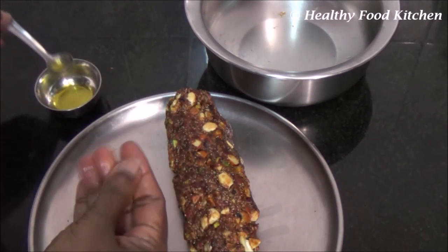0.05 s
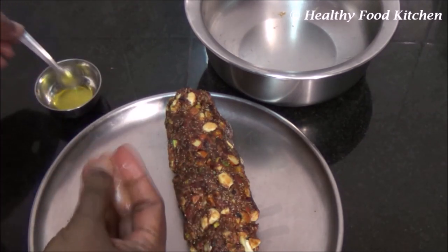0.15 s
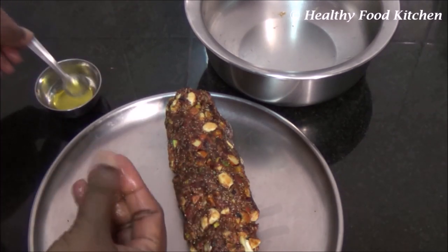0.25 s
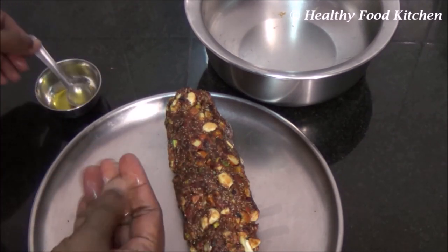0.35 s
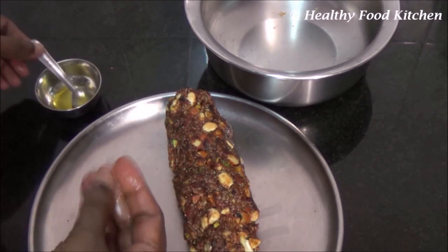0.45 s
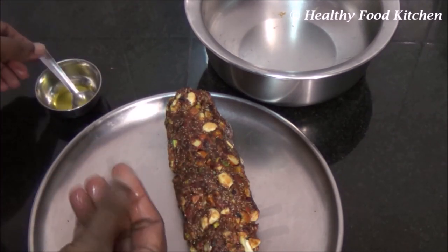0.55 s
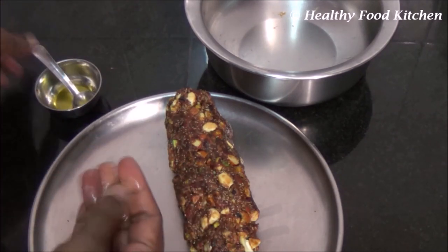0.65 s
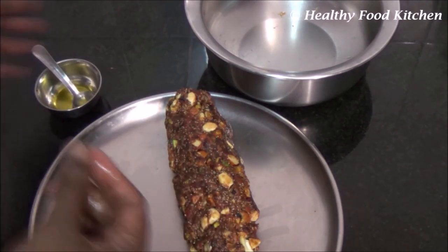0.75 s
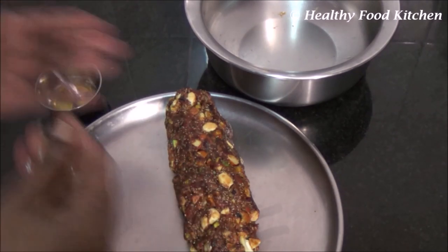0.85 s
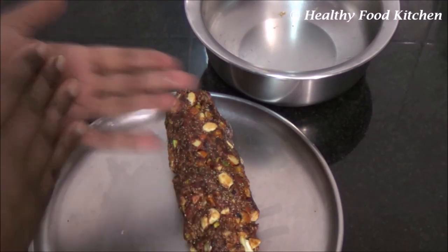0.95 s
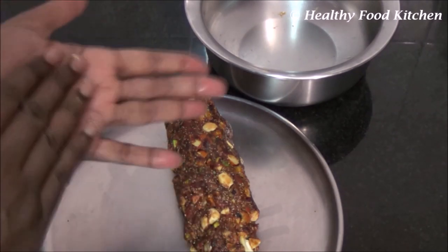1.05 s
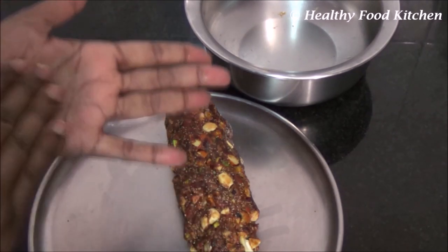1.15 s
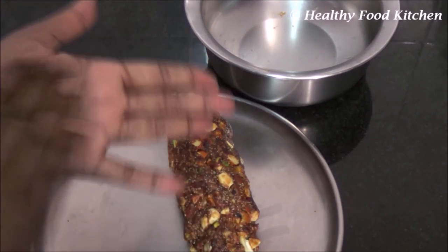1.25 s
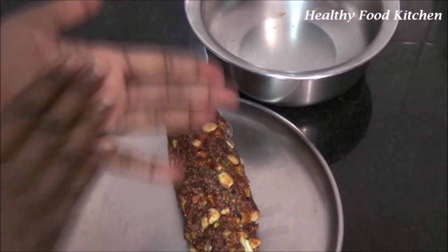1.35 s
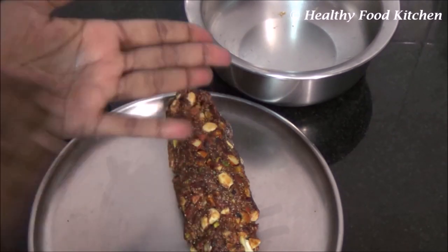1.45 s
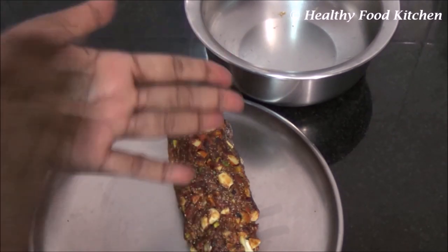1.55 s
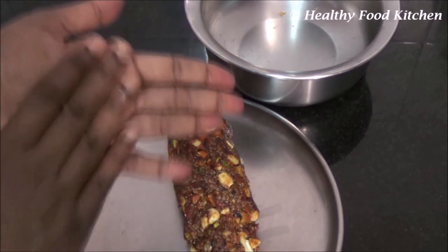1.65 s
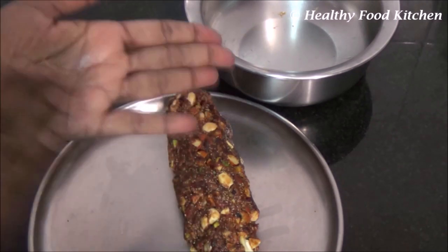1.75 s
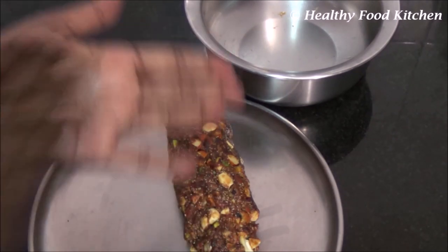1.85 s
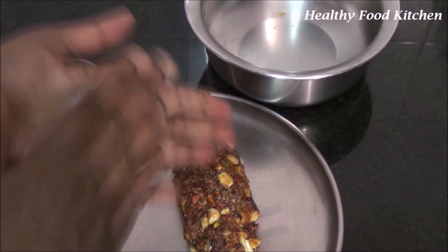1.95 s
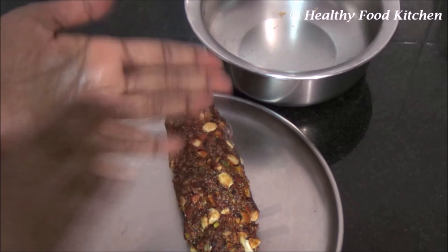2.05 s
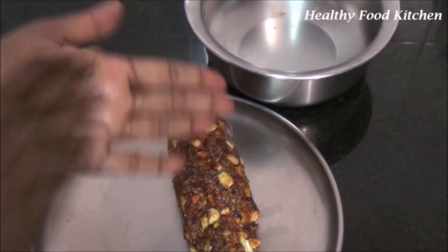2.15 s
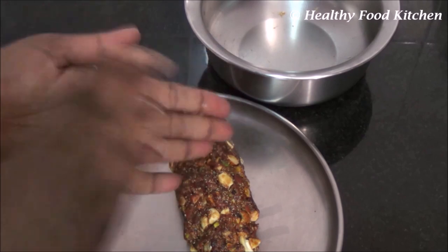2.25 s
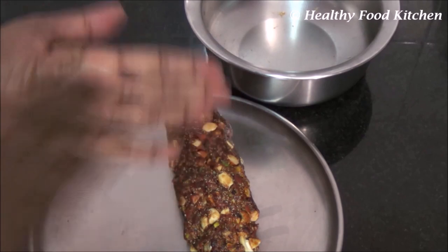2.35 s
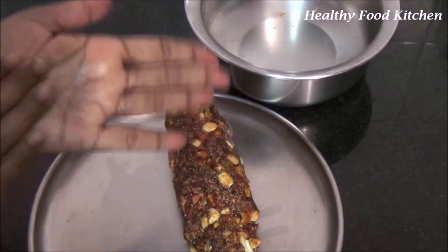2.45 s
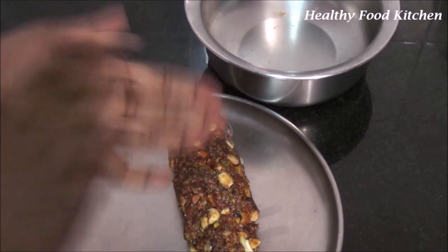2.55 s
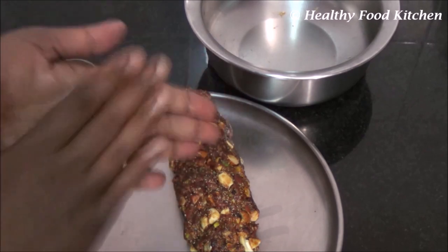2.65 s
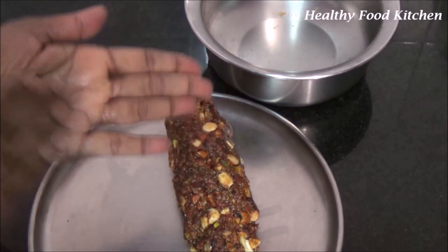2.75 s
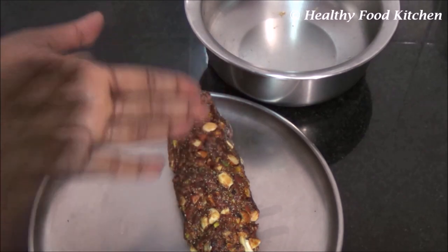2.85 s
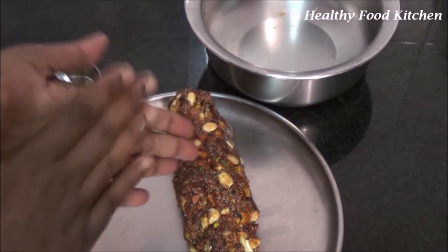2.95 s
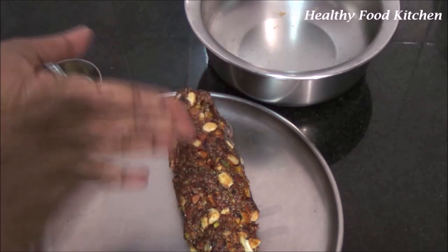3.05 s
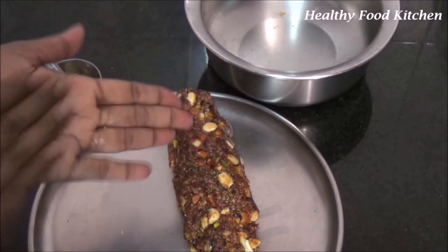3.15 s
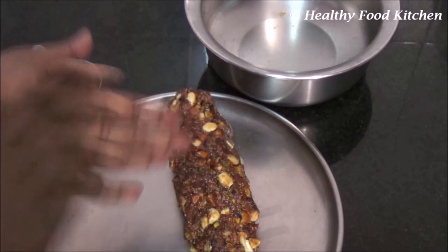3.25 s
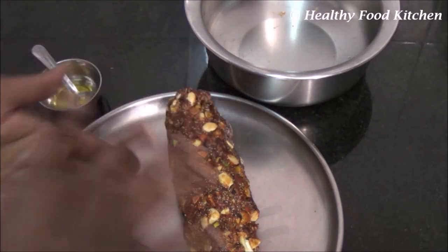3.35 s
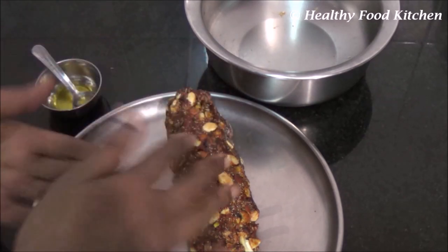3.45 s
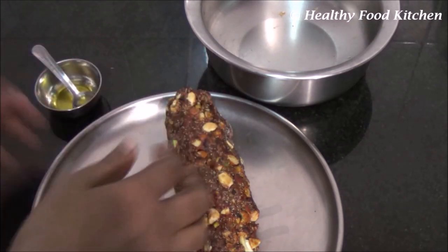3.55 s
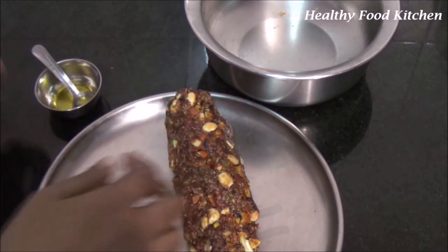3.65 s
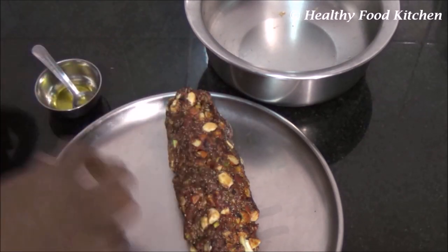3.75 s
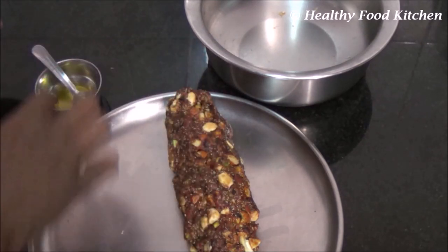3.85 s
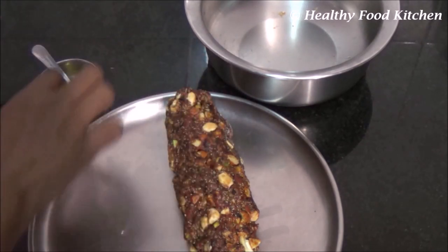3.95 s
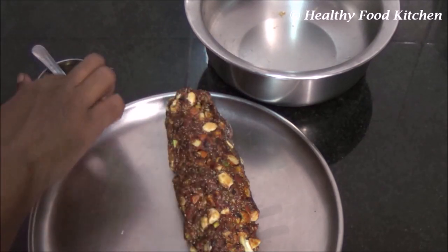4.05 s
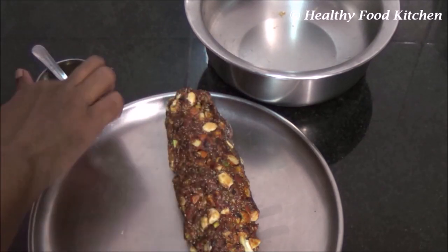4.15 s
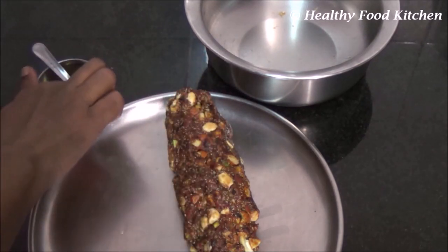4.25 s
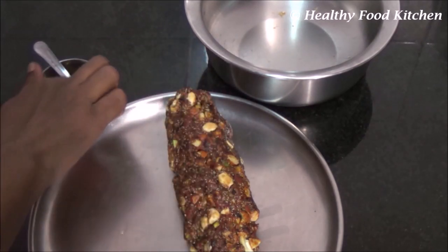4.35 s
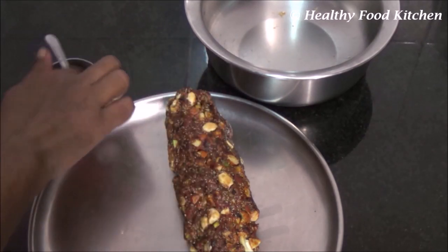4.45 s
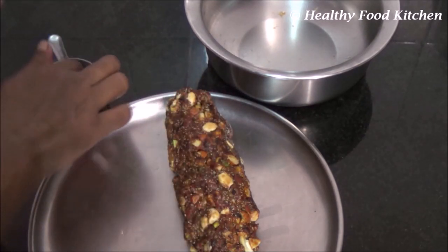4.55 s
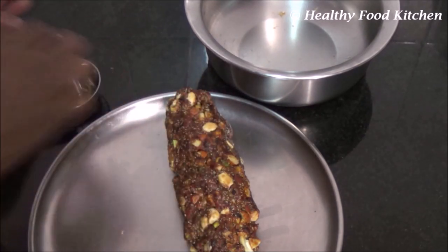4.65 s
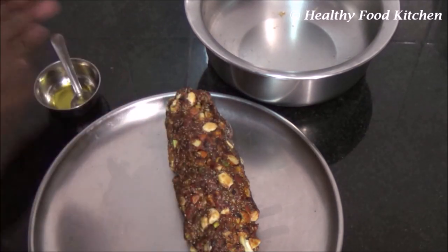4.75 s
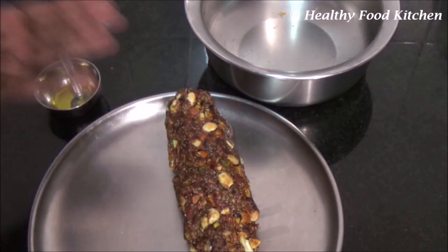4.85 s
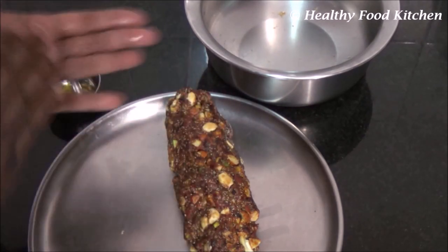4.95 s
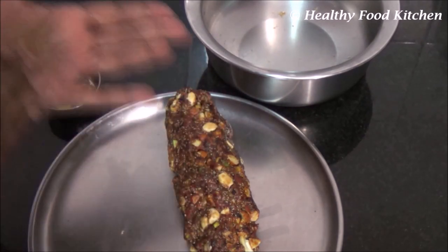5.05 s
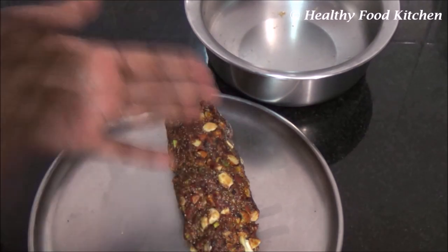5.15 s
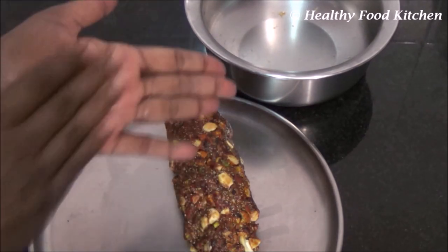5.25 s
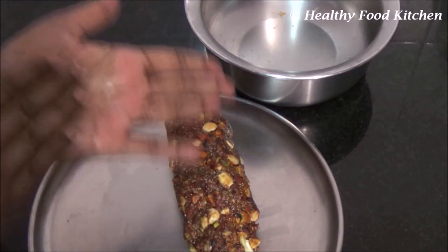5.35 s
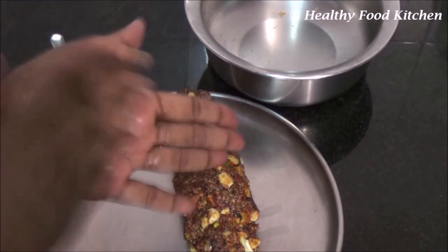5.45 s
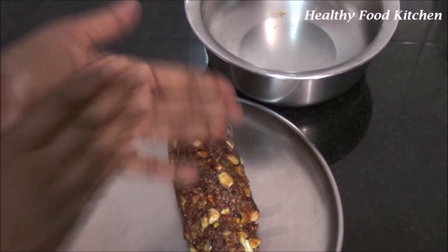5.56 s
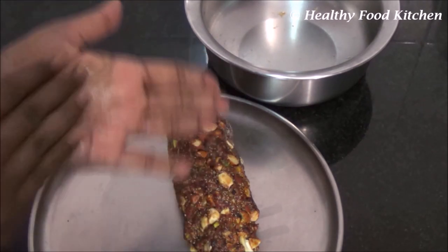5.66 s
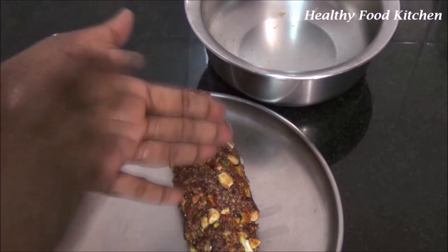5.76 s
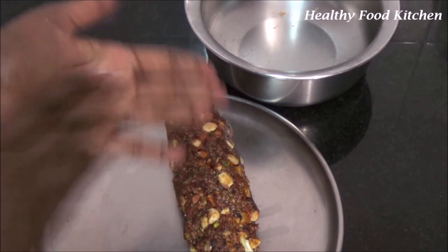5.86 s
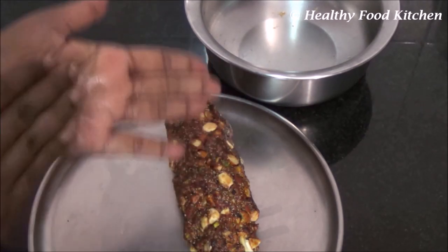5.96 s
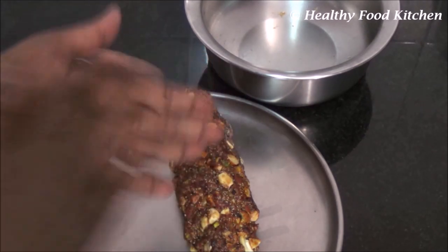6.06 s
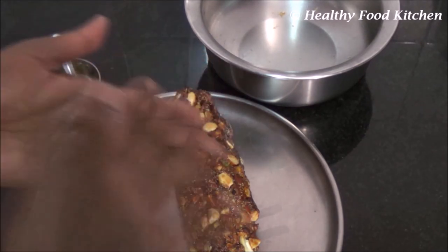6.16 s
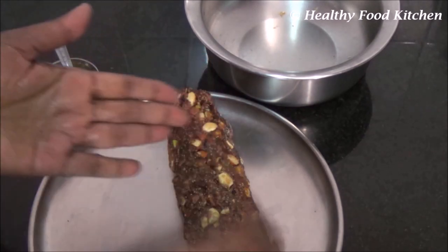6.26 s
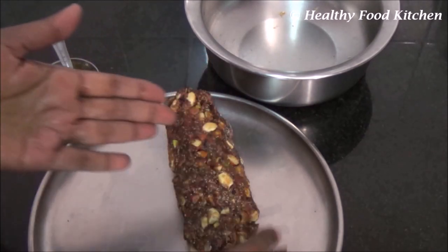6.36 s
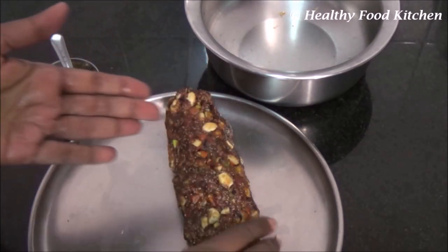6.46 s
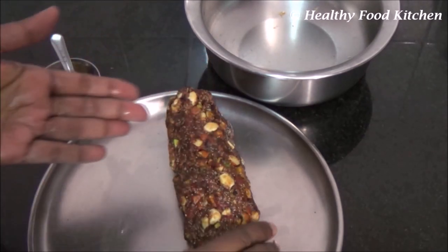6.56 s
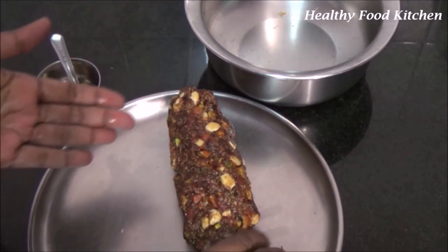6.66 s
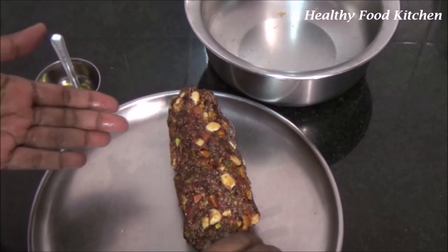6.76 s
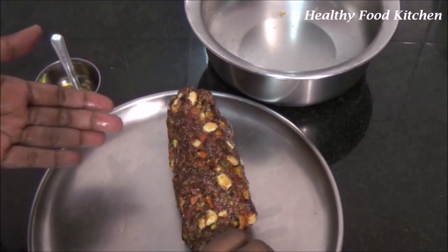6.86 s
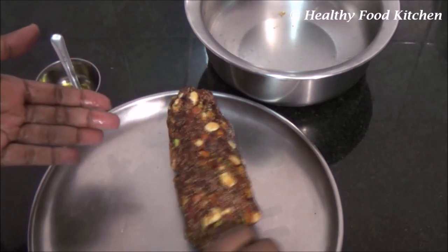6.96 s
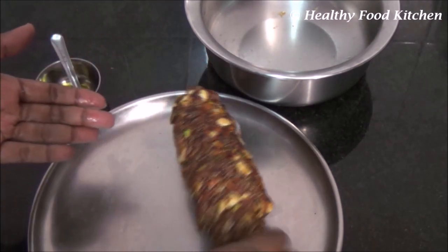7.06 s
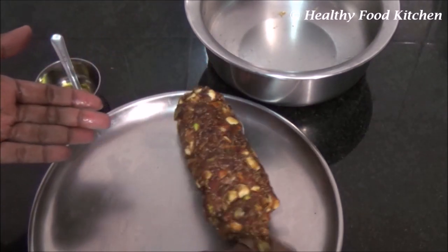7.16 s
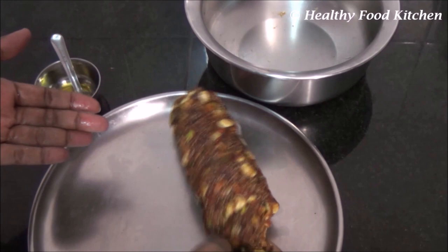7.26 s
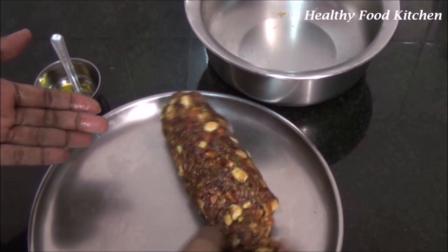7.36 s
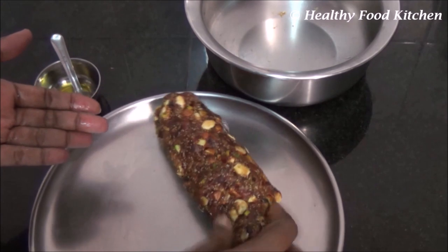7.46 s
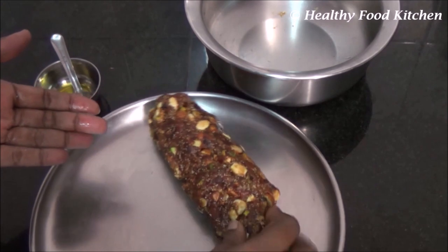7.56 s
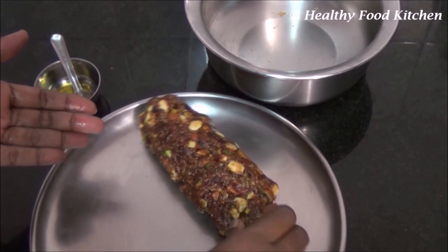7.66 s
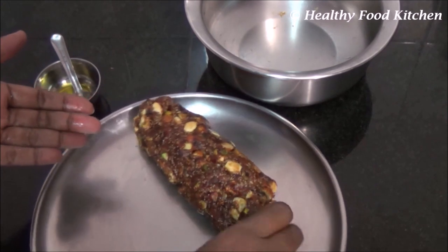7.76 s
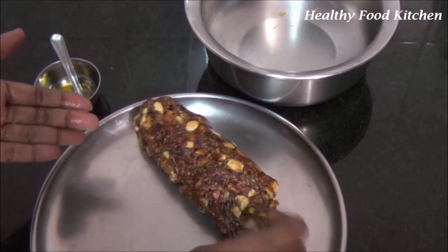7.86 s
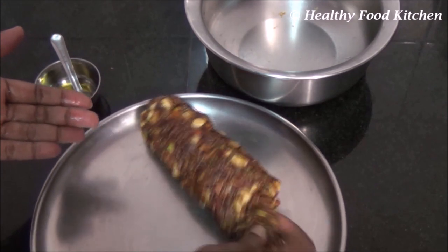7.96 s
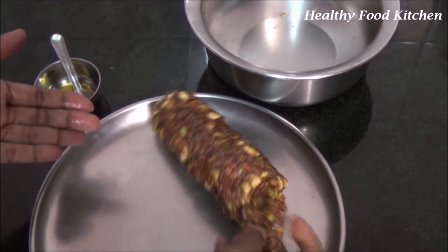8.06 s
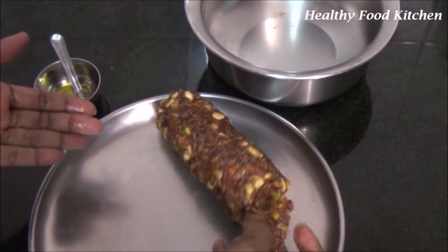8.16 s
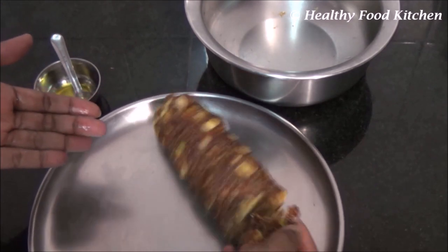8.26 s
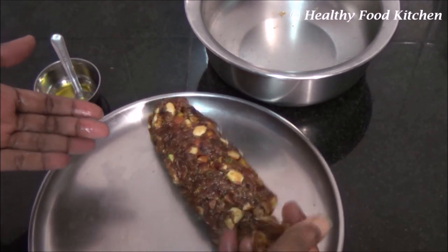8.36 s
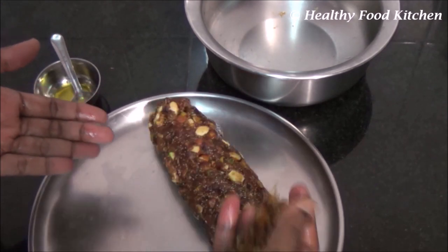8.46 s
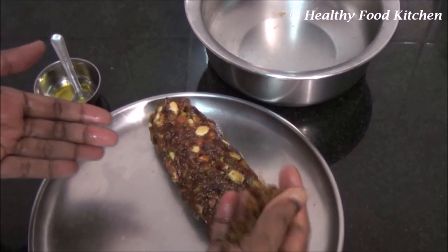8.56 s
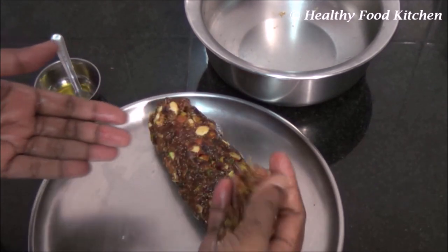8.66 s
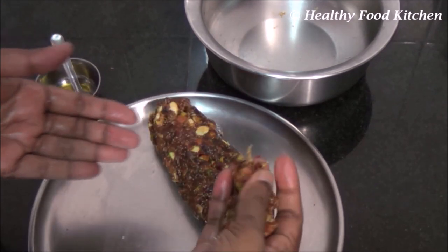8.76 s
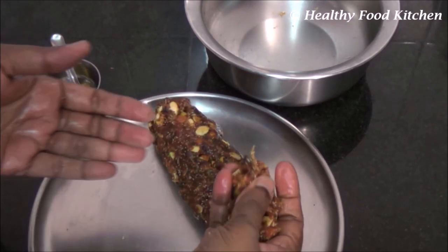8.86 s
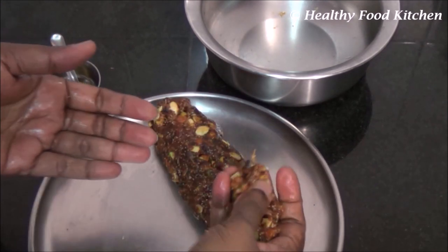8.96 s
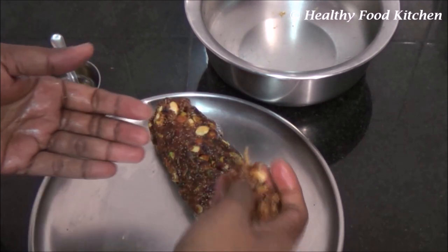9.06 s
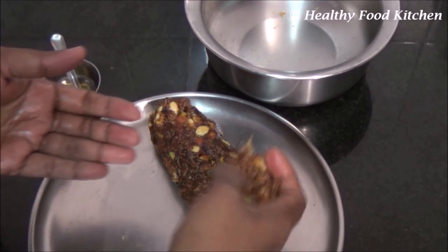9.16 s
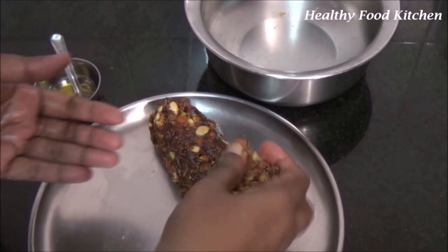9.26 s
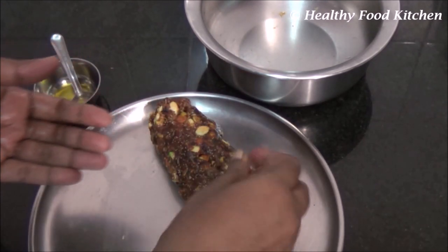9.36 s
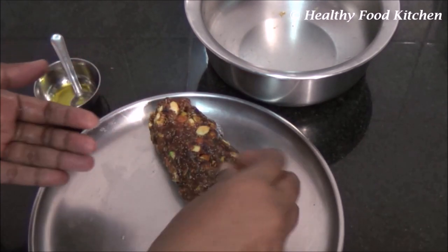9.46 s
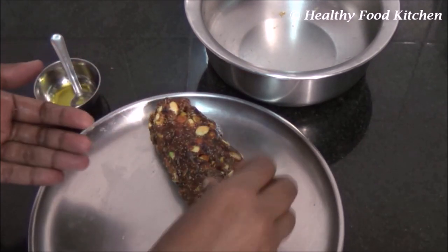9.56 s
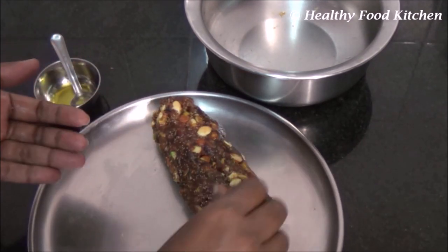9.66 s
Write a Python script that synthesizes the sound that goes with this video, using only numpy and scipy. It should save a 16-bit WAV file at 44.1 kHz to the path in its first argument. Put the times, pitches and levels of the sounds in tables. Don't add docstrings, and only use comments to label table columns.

```python
import sys
import numpy as np
from scipy import signal
from scipy.fft import rfft, irfft
from scipy.io import wavfile
from scipy.ndimage import uniform_filter1d

SR = 44100
rng = np.random.default_rng(int(sys.argv[2]) if len(sys.argv) > 2 else 0)


def attenuation_scalar(level_db):
    decades = np.asarray(level_db, float) / 20
    return 10 ** decades


def transcribe(u):
    v = np.clip(np.atleast_2d(u).T, -1, 1)
    q = np.round(v * 32767).astype(np.int16)
    wavfile.write(sys.argv[1], SR, q)


N = 428211


def evened(x):
    return x / np.sqrt(np.mean(x ** 2) + 1e-20)


def read(points, hz):
    f, value = np.transpose(points)
    return np.interp(np.log(hz + 1), np.log(f + 1), value)


def add(mix, s, sound):
    part = mix[round(s * SR):][:len(sound)]
    part += sound[:len(part)]


def colour(x, points):
    hz = np.fft.rfftfreq(x.shape[-1], 1 / SR)
    return evened(irfft(rfft(x) * attenuation_scalar(read(points, hz)), x.shape[-1]))


def resonate(x, hz, width):
    turn = np.exp(2j * np.pi * np.cumsum(hz * np.ones(len(x))) / SR)
    r = np.exp(-np.pi * abs(width) / SR)
    smooth = signal.lfilter([1 - r], [1, -r], x / turn)
    return 2 * (turn * smooth).real


def wander(seconds, n=N):
    size = max(int(seconds * SR), 1)
    once = uniform_filter1d(rng.standard_normal(n), size)
    return evened(uniform_filter1d(once, size))


def grains(n, per_s, spread_db):
    size = attenuation_scalar(spread_db * np.minimum(rng.exponential(1, n), 5)) * rng.standard_normal(n)
    return evened(size * (rng.random(n) < per_s / SR))


def ring(t, hz, width):
    return np.sin(2 * np.pi * hz * t) * np.exp(-np.pi * abs(width) * t)


def patchy(x, db):
    z = signal.stft(x, nperseg=256)[2]
    field = uniform_filter1d(rng.standard_normal(z.shape), size=4, axis=0)
    field = uniform_filter1d(field, size=8, axis=1)
    return evened(signal.istft(z * attenuation_scalar(db * evened(field)), nperseg=256)[1][:len(x)])


def swell(t, middle, length, db, power=2):
    return attenuation_scalar(db - 6 * abs(2 * (t - middle) / length) ** power)


def lingering(t, middle, length, db):
    stroke = swell(t, middle, length, db + .8, 1.5)
    trail = swell(t, middle + .3 * length, 2.2 * length, db - 13)
    return np.hypot(stroke, trail)


def together(gains):
    return np.sqrt((gains ** 2).sum(0))


def diffuse(left, other):
    # f/Hz, left-right likeness [0 to 1]
    likeness = [(60, 0.95), (130, 0.86), (290, 0.94), (640, 0.58), (1410, 0.16), (3100, 0.29), (6820, 0.33),
                (15000, 0.9)]
    same = np.clip(read(likeness, np.fft.rfftfreq(N, 1 / SR)), 0, 1)
    right = irfft(same * rfft(left) + np.sqrt(1 - same ** 2) * rfft(other), N)
    return np.array([left, right])


def rub(rows):
    # f/Hz, level/dB
    ridge_colour = [(6000, -15.5), (8500, -11), (10000, -2), (11500, 0), (13000, -3.5), (14500, -7.5),
                    (15700, -13.5)]
    # f/Hz, level/dB
    crease_colour = [(900, -19), (1800, -8), (2600, -4.5), (4000, -5), (5500, -2), (8000, -3), (11000, -8),
                     (15700, -23)]
    middle, length, pressure_db, crease_db = np.transpose(rows)[:, :, None]
    t = np.arange(round(middle.min()) - .2, round(middle.max()) + .7, 1 / SR)
    n = len(t)
    hiss = patchy(colour(grains(n, 18000., 1.15), ridge_colour), 1.5)
    scrape = patchy(colour(grains(n, 20000., 0.8), crease_colour), 1.9)
    creases = together(lingering(t, middle - .1 * length, 1.1 * length, pressure_db + crease_db))
    ridges = together(lingering(t, middle, .9 * length, pressure_db))
    tremble = attenuation_scalar(0.4 + 1.1 * wander(0.008, n))
    return t[0], tremble * (ridges * hiss + attenuation_scalar(0.3) * creases * scrape)


def palms():
    # middle t/s, length [s], pressure level/dB, creases level/dB
    bouts = [
        [(1.465, .065, -55, -2), (1.59, .09, -52, -4), (1.775, .10, -48.5, -2), (1.915, .12, -50.5, -3),
         (2.085, .10, -48, -2), (2.205, .12, -45.5, -1), (2.31, .06, -54, 2), (2.41, .12, -49, -2),
         (2.565, .08, -44, -2), (2.74, .085, -47.5, -2), (2.895, .08, -46, -1), (3.07, .13, -50.5, -2),
         (3.247, .085, -49, -1), (3.42, .10, -52.5, -2), (3.505, .06, -54.5, 0)],
        [(5.195, .05, -56, -2), (5.27, .07, -58, -3), (5.365, .09, -55, -1), (5.49, .1, -57.5, -2),
         (5.665, .1, -53.5, -1), (5.77, .09, -54.5, -3), (5.95, .08, -56, -1), (6.08, .09, -54.5, -2),
         (6.26, .08, -54.5, -1), (6.35, .05, -54, -3)],
    ]
    out = np.zeros(N)
    for rows in bouts:
        add(out, *rub(rows))
    return out


def pockets():
    # middle t/s, length [s], level/dB, from f/Hz, to f/Hz
    trapped_air = [(1.48, .06, -61, 2700, 2700), (1.6, .05, -62, 3600, 3600), (1.76, .06, -55, 5800, 5300),
                   (1.785, .05, -55, 2700, 2400), (1.86, .1, -58, 2800, 3100), (1.89, .06, -57, 3500, 3800),
                   (1.95, .04, -59, 6000, 6000), (2.04, .05, -58, 5800, 6200), (2.09, .08, -57, 2900, 2500),
                   (2.09, .06, -54, 5000, 5300), (2.15, .03, -53, 3100, 3300),
                   (2.185, .09, -50, 3800, 3800), (2.2, .06, -54, 6500, 6300), (2.3, .07, -55, 4900, 4700),
                   (2.42, .03, -57, 2000, 2000), (2.445, .05, -57, 2900, 2600),
                   (2.55, .05, -49, 3700, 3900), (2.555, .05, -53, 6000, 5800),
                   (2.57, .02, -55, 1900, 1900), (2.59, .025, -53, 4000, 3500),
                   (2.75, .05, -56, 5200, 5600), (2.82, .05, -59, 2900, 3200),
                   (2.885, .05, -48, 3700, 4500), (2.89, .04, -54, 6000, 6000),
                   (2.99, .06, -57, 4300, 4300), (3.08, .05, -58, 6500, 6300), (3.2, .04, -57, 3300, 3000),
                   (3.24, .045, -50, 3300, 3100), (3.235, .03, -55, 5800, 5800),
                   (3.29, .03, -57, 3000, 3500), (3.49, .04, -57, 4000, 3500), (4.7, .2, -64, 720, 800),
                   (5.39, .04, -60, 3200, 3200), (5.665, .04, -58, 2800, 2300),
                   (5.67, .03, -58, 4300, 4600), (5.9, .06, -61, 2800, 3000), (5.95, .04, -59, 3300, 3200),
                   (6.06, .09, -61, 2300, 3000), (6.27, .04, -61, 4000, 4200)]
    out, t = np.zeros(N), np.arange(-.2, .2, 1 / SR)
    for middle, length, db, from_hz, to_hz in trapped_air:
        hz = from_hz + (to_hz - from_hz) * np.clip(.5 + t / length, -.5, 1.5)
        width = from_hz / 5.5
        slips = grains(len(t), 5000., 1.1)
        sound = evened(resonate(resonate(slips, hz, width), hz, width))
        add(out, middle + t[0], swell(t, 0, length, db) * sound)
    return out


def fingers():
    # peak t/s, 20 dB rise [s], 20 dB fall [s], crackle level/dB, drag level/dB
    grips = [(.045, .05, .04, -60, -66), (.38, .6, .25, -69, -75), (.51, .012, .9, -65, -75),
             (1.19, .021, .045, -57, -57), (1.33, .12, .6, -59, -61), (5.085, .08, .08, -63, -75),
             (6.87, .25, .22, -55, -57), (7.054, .17, .11, -52.5, -48), (7.075, .1, .05, -57, -56),
             (7.165, .02, .05, -60, -52), (7.2, .05, .6, -59, -60), (7.546, .11, .065, -59, -57),
             (7.83, .4, .15, -56, -62), (7.88, .06, .2, -57, -62), (7.975, .06, .1, -57, -60),
             (8.06, .15, .2, -58, -60), (8.106, .006, .08, -51, -48), (8.15, .03, .25, -56, -56),
             (8.24, .1, .1, -59, -62), (8.3, .05, .09, -51, -50), (8.493, .06, .04, -54, -50.5),
             (8.525, .012, .15, -69, -54), (8.679, .04, .11, -58, -63), (8.95, .21, 1.1, -61, -67),
             (9.27, .8, .13, -59, -65), (9.387, .021, .05, -63, -55), (9.427, .06, .055, -58, -77),
             (9.6, .55, .55, -68, -71)]
    # f/Hz, level/dB
    drag_colour = [(530, -45), (900, -11), (1430, -18), (1980, -0.5), (2460, -6), (3040, -4), (4200, -5.5),
                   (7000, -10.5), (9100, -34), (15400, -120)]
    crackle_colour = [(3000, -17), (6000, -6.5), (10500, 0.1), (13000, -4), (15700, -15)]  # f/Hz, level/dB
    peak, rise, fall, crackle_db, drag_db = np.transpose(grips)[:, :, None]
    t, coarse_t = np.arange(N) / SR, np.arange(0, N, 20) / SR
    shape_db = -20 * np.maximum((peak - coarse_t) / rise, (coarse_t - peak) / fall)
    bright = np.interp(t, coarse_t, together(attenuation_scalar(crackle_db + shape_db)))
    dull = np.interp(t, coarse_t, together(attenuation_scalar(drag_db + shape_db)))
    crackle = patchy(colour(grains(N, 12000., 1.7), crackle_colour), 3.0)
    drag = patchy(colour(grains(N, 6000., 1.7), drag_colour), 1.7)
    return attenuation_scalar(0.9) * bright * crackle + attenuation_scalar(-0.6) * dull * drag


def snap(db, hz):
    t = np.arange(400) / SR
    burst = rng.standard_normal(len(t)) * np.exp(-t / 0.0017)
    sound = resonate(resonate(burst, hz, 3000), hz, 5000)
    return attenuation_scalar(db - 2.5) * sound / abs(sound).max()


def plate_shudder(n):
    # f/Hz, width [Hz], level/dB
    plate_modes = [(1717, 110, -3), (1922, 120, -2.1), (2277, 140, -3), (3500, 300, -8)]
    hz, width = 1950, 1800
    jolt = rng.standard_normal(n)
    shudder = evened(resonate(resonate(jolt, hz, width), hz, width))
    modes = sum(attenuation_scalar(db) * evened(resonate(jolt, f, w)) for f, w, db in plate_modes)
    return evened(shudder + attenuation_scalar(-3.) * modes)


def log_on_plate():
    # t/s, peak level/dB, f/Hz
    snaps = [(0.6659, -44, 7650), (0.7317, -47, 10100), (3.6624, -38.5, 12000), (3.8432, -40, 12100),
             (6.7411, -38, 14100), (6.7655, -43, 13600), (6.8387, -35, 8160), (6.8828, -35, 10800),
             (6.9097, -39, 10900), (7.013, -37, 11900), (7.0396, -32, 9850), (7.2456, -37, 10400),
             (7.2462, -41, 6800), (7.3392, -39, 11200), (7.426, -40, 9600), (7.9643, -41, 8190),
             (8.0594, -40, 12600), (8.0714, -38, 6860), (8.0995, -42, 6500), (8.1056, -33, 9000),
             (8.174, -40, 7500), (8.1294, -38, 11700), (8.1694, -38, 9020), (8.2826, -38, 11000),
             (8.3, -36, 9590), (8.674, -36, 11200), (8.6776, -39, 10300), (8.9136, -41, 10000),
             (8.9965, -40, 9550), (9.192, -40, 10600), (9.274, -42, 10800), (9.4244, -44, 10700)]
    # t/s, peak level/dB, f/Hz, width [Hz], plate shudder level/dB
    knocks = [(7.0378, -35, 4500, 900, -30), (7.040, -33, 1850, 400, -22), (7.0518, -32.5, 2100, 500, -22),
              (7.057, -35, 1900, 400, -20), (7.0618, -37, 2000, 300, -20), (7.0742, -35, 3000, 300, -30),
              (7.067, -37, 1700, 400, -25), (7.028, -41, 3000, 900, -20), (7.081, -41, 3300, 600, -25),
              (7.0755, -32, 2100, 400, -19), (7.1568, -26, 2600, 1100, -21), (7.1572, -30, 4300, 1400, -30),
              (7.158, -46, 6500, 500, -30), (7.168, -39, 2800, 800, -12), (7.2905, -37.5, 1900, 600, -17),
              (7.3265, -35, 2300, 1200, -24), (7.327, -37, 4000, 1200, -24), (8.1051, -16, 2000, 1500, -30),
              (8.1053, -12.5, 3900, 2400, -37), (8.1063, -19, 3280, 770, -25),
              (8.1066, -25, 5500, 900, -30), (8.1075, -21.5, 3900, 1100, -28),
              (8.1091, -21.5, 2750, 800, -31), (8.1135, -31, 2200, 400, -25), (8.117, -35, 1700, 400, -24),
              (8.1125, -37, 6000, 900, -30), (8.13, -36, 3200, 900, -24), (8.298, -43, 2980, 45, -12),
              (8.2985, -46, 1750, 150, -12), (8.309, -46, 5000, 300, -15), (8.4755, -31, 2400, 1500, -22),
              (8.476, -36, 4500, 1500, -25), (8.493, -45, 3900, 200, -6), (8.5078, -27, 1900, 320, -14),
              (8.5092, -34, 4700, 600, -25), (8.5084, -27, 3200, 700, -25), (8.5125, -36, 3000, 250, -14),
              (8.54, -46, 1900, 100, -6), (8.5095, -38, 1400, 250, -16), (8.497, -39, 2000, 900, -15),
              (9.387, -36, 4100, 800, -22)]
    out, t = np.zeros(N), np.arange(5000) / SR
    for s, db, hz in snaps:
        add(out, s, snap(db, hz))
    add(out, 8.105, attenuation_scalar(-46) * ring(t, 150, 40))
    for s, db, hz, width, shudder_db in knocks:
        add(out, s, -attenuation_scalar(db + 6.2) * ring(t, hz, width) * np.minimum(t / 0.0004, 1))
        fading = attenuation_scalar(db + shudder_db - 60 * t / 0.11)
        add(out, s, fading * plate_shudder(len(t)) * np.minimum(t / 0.00097, 1))
    return out


def cup_shiver(t):
    # points of (f/Hz, level/dB), then level/dB, time to fall 60 dB [s]
    cup_body = [(290, -33), (500, -9), (630, -17), (749, 0.5), (943, -9), (999, -16), (1090, -12),
                (1430, -20), (2700, -3.5), (3310, -15), (4480, -13), (11800, -11), (15700, -28)], -38.5, 0.5
    # f/Hz, width [Hz], level/dB, time to fall 60 dB [s]
    cup_wall = [(755, 40, -50, .5), (930, 40, -53, .45), (2250, 150, -52, .35), (2680, 260, -49, .75),
                (3806, 200, -46, .17), (5566, 150, -50, .3), (6440, 150, -51, .25), (7763, 120, -48, .25),
                (9130, 120, -45, .28), (10620, 150, -48, .35), (11840, 100, -45, .35),
                (12590, 150, -51, .3)]
    shiver_colour, shiver_db, t60 = cup_body
    fading = attenuation_scalar(shiver_db - 60 * t / t60) * np.minimum(t / .003, 1)
    flutter = attenuation_scalar(2.2 * wander(.004, len(t)))
    out = fading * flutter * colour(rng.standard_normal(len(t)), shiver_colour)
    for hz, width, db, t60 in cup_wall:
        wall = evened(resonate(rng.standard_normal(len(t)), hz, width))
        out += attenuation_scalar(db - 60 * t / t60) * np.minimum(t / .002, 1) * wall
    return out


def spoon_drop():
    # f/Hz, width [Hz], level/dB
    cup_modes = [(900, 500, -24), (1800, 800, -21), (2450, 350, -19.5), (2930, 330, -17.5),
                 (3850, 300, -20), (5150, 220, -19.5), (6440, 350, -20), (7800, 450, -13.5),
                 (9240, 300, -18), (10700, 700, -15), (11800, 45, -35), (12200, 450, -11),
                 (12950, 500, -12), (15000, 1500, -21)]
    # t/s, level/dB, damping [factor], tilt [dB per octave]
    bounces = [
        (.7729, -2.5, 1.4, 1.2),
        (.77352, -5.5, 1.1, .8),
        (.7742, -7.5, 1.1, -3.5),
        (.7757, -19, 1.1, 1.5),
        (.7785, -12, 1.1, 2.2),
        (.7802, -19, 1.2, 2.2),
        (.7851, -9, 2.3, 2.2),
    ]
    out, t = np.zeros(N), np.arange(16000) / SR
    for s, bounce_db, damping, tilt_db in bounces:
        for k, (hz, width, db) in enumerate(cup_modes):
            level = (-1) ** k * attenuation_scalar(bounce_db + db + tilt_db * np.log2(hz / 6000))
            add(out, s, level * ring(t, hz, width * damping) * np.minimum(t * hz / 2.6, 1))
    add(out, bounces[0][0], cup_shiver(t))
    return out


def rim(t, tilt_db):
    # f/Hz, width [Hz], level/dB
    rim_modes = [(2640, 240, 6.5), (3080, 90, 0), (3990, 170, 5.5), (4900, 300, -3), (7070, 390, -4),
                 (8100, 200, -3), (9630, 120, -3), (10200, 110, -7), (11000, 170, -4), (12300, 110, -2)]
    out = np.zeros(len(t))
    for hz, width, db in rim_modes:
        level = attenuation_scalar(db + tilt_db * np.log2(hz / 6000)) * rng.choice([-1, 1])
        out += level * ring(t, hz, width * 2.3)
    return out


def spoon_touches():
    # t/s, peak level/dB, f/Hz, width [Hz]
    taps = [(4.41, -49, 3000, 150), (4.428, -50, 3050, 90), (4.44, -50, 3000, 100), (4.44, -53, 5170, 100),
            (4.6298, -37, 3000, 250), (4.6294, -43, 4500, 500), (4.6945, -41, 4000, 70),
            (4.694, -44, 12450, 220), (4.7015, -47, 12450, 200), (4.6298, -39, 8300, 250),
            (4.6298, -40, 11000, 300), (4.632, -56, 9593, 25), (4.708, -47, 7000, 400),
            (4.696, -44, 2550, 90), (4.634, -45, 2700, 200), (4.7025, -48, 3950, 90),
            (4.709, -48, 3000, 150), (4.7195, -45, 2300, 900)]
    # t/s, level/dB, tilt [dB per octave], scrape length [s]
    nudges = [
        (4.409, -45, -3, .02),
        (4.6298, -35, 2.5, 0.0035),
        (4.65, -50, -1, .005),
        (4.6938, -40, .8, 0.003),
        (4.701, -45, -.6, .005),
        (4.711, -50, -1.5, .005),
    ]
    out, t = np.zeros(N), np.arange(16000) / SR
    for s, db, hz, width in taps:
        add(out, s, attenuation_scalar(db) * ring(t, hz, width) * np.minimum(t / 0.000088, 1))
    for s, db, tilt_db, length in nudges:
        scrape = rng.standard_normal(2000) * np.exp(-t[:2000] / length)
        scrape[0] = 3.2
        scrape /= np.linalg.norm(scrape)
        add(out, s, attenuation_scalar(db - 5.5) * signal.fftconvolve(scrape, rim(t, tilt_db)))
    return out


def placed(x, pan_db):
    taps = np.zeros((2, 200))
    at = (rng.uniform(.15, 1, (2, 5)) * .0025 * SR).astype(int).clip(1, 199)
    np.put_along_axis(taps, at, attenuation_scalar(-14.5 - 7) * rng.choice([-1., 1.], at.shape), 1)
    taps[:, 0] = attenuation_scalar([pan_db, -pan_db])
    return signal.oaconvolve(x[None], taps, axes=1)[:, :N]


def kitchen(x):
    # f/Hz, time to fall 60 dB [s]
    fade_times = [(300, .5), (1000, 0.57), (2500, 0.4), (6000, 0.24), (12000, 0.2), (16000, 0.09)]
    taps = np.zeros((2, SR // 2))
    at = np.arange(300, SR // 2 - 20, 20)
    at = at + rng.integers(0, 20, (2, len(at)))
    np.put_along_axis(taps, at, rng.choice([-1., 1.], at.shape), 1)
    hz, t, z = signal.stft(taps, SR, nperseg=128)
    fading = attenuation_scalar(-60 * t / read(fade_times, hz)[:, None])
    tail = signal.istft(z * fading, SR, nperseg=128)[1]
    tail /= np.linalg.norm(tail[0])
    return diffuse(*signal.fftconvolve(x[None], tail, axes=1)[:, :N])


def fridge():
    # t/s, f/Hz, level/dB
    shaft = [(0.4, 295.5, -49), (2.93, 295.4, -47), (4.47, 295.4, -49), (6.8, 295.4, -47.5),
             (9.3, 295.4, -48)]
    # multiple, level/dB
    shaft_orders = [(1, -64), (5, -68), (7, -57), (8, -77), (13, -80), (14, -77), (17, -75), (19, -72),
                    (20, -80), (27, -73), (47, -78), (49, -80), (53, -79), (55, -75), (57, -78), (74, -77)]
    # f/Hz, level/dB
    steady_tones = [(200.4, -73), (300.7, -65), (401, -74), (651.5, -75), (15475, -92), (15525, -88),
                    (15575, -91), (15625, -74.5), (15675, -85), (15725, -87)]
    # f/Hz, width [Hz], level/dB, flicker [dB]
    whistles = [(372, 6, -70, 1.5), (628, 5, -69, 1.5), (3515, 25, -74, 2.5), (2710, 420, -65.5, 0),
                (6400, 500, -71, 3)]
    t = np.arange(N) / SR
    s, shaft_hz, level_db = np.transpose(shaft)
    turns = np.cumsum(np.interp(t, s, shaft_hz)) / SR / 6
    hum = attenuation_scalar(np.interp(t, s, level_db)) * np.sin(2 * np.pi * 6 * turns)
    for k, db in shaft_orders:
        hum += attenuation_scalar(db + 1.5 * wander(0.12)) * np.sin(2 * np.pi * (k * turns + rng.random()))
    out = np.sqrt(2) * np.array([hum, np.roll(hum, 2)])
    for hz, db in steady_tones:
        out += np.sqrt(2) * attenuation_scalar(db) * np.sin(2 * np.pi * (hz * t + rng.random()))
    for hz, width, db, flicker_db in whistles:
        pair = [evened(resonate(rng.standard_normal(N), hz, width)) for side in range(2)]
        out += attenuation_scalar(db + flicker_db * wander(0.064)) * diffuse(*pair)
    return out


def steadied(hz, width):
    band = resonate(rng.standard_normal(N), hz, width)
    return evened(band / abs(signal.hilbert(band)) ** 0.45)


def traffic():
    # middle t/s, length [s], level/dB
    swells = [(0.02, .2, -57), (1.6, .35, -59), (2.25, .4, -59), (2.56, .2, -55), (3.11, .25, -55),
              (4.19, .15, -62), (4.48, .09, -60), (6.08, .07, -57), (7.63, .15, -62), (8.17, .17, -55.5),
              (8.98, .2, -61), (9.49, .2, -59)]
    t = np.arange(N) / SR
    passing = together(swell(t, *np.transpose(swells)[:, :, None]))
    resting = attenuation_scalar(-66 + 2.5 * wander(0.11))
    return attenuation_scalar(-1.5) * np.hypot(resting, passing) * steadied(121.7, 14.4)


def valve():
    # t/s, whistle f/Hz, level/dB
    flow = [(0, 3642, -67.5), (1.1, 3643, -68), (1.6, 3642, -71), (3.2, 3642, -70), (3.6, 3642, -68),
            (4.2, 3643, -69), (4.6, 3643, -72), (5.15, 3643, -67), (5.6, 3642, -70), (6.35, 3642, -68),
            (6.7, 3642, -73), (7.6, 3642, -69.5), (8.6, 3643, -72), (9.2, 3643, -69.5), (9.7, 3642, -72)]
    t = np.arange(N) / SR
    s, hz, db = np.transpose(flow)
    level = attenuation_scalar(np.interp(t, s, db) - 1.2 + 1.2 * wander(0.11))
    return level * steadied(np.interp(t, s, hz), 10.)


def air():
    # f/Hz, level/dB
    air_colour = [(15, -47), (25, -22), (62, -18), (95, -21), (199, -13.5), (241, -15.5), (291, -8),
                  (413, -11.5), (635, -15), (688, -18.5), (788, -15), (1060, -21), (2720, -24.5),
                  (5200, -30), (15700, -36)]
    return attenuation_scalar(-52 + 0.36 * wander(0.12)) * diffuse(*colour(rng.standard_normal((2, N)), air_colour))


def scene():
    cup = spoon_drop() + spoon_touches()
    hands = palms() + pockets()
    log = log_on_plate() + fingers()
    near = placed(cup, .6) + placed(hands, .2) + placed(log, -.4)
    echoes = kitchen(attenuation_scalar(-7.5) * (cup + hands) + attenuation_scalar(-12) * log)
    return near + echoes + fridge() + traffic() + valve() + air()


def band_limit(x):
    return signal.sosfilt(signal.butter(12, 16490, fs=SR, output="sos"), x)


def record(dry):
    edge = signal.firwin(2047, 15745, window=("kaiser", 8), fs=SR)
    mix = signal.oaconvolve(dry, edge[None], "same")
    return band_limit(mix)


dry = scene()
out = record(dry)
transcribe(out)
```